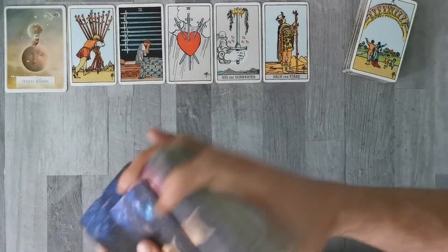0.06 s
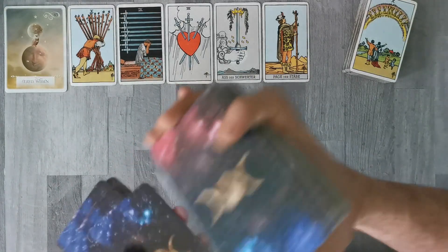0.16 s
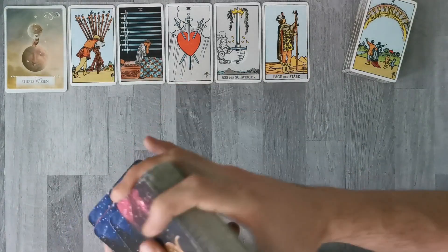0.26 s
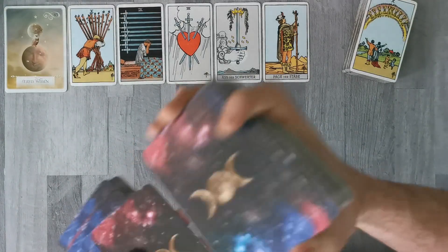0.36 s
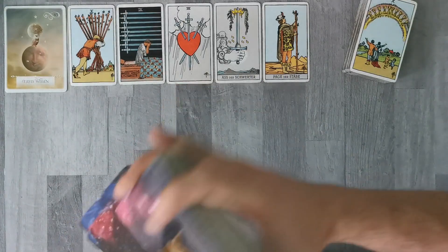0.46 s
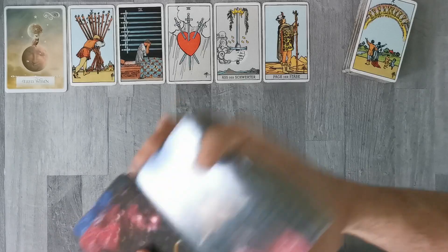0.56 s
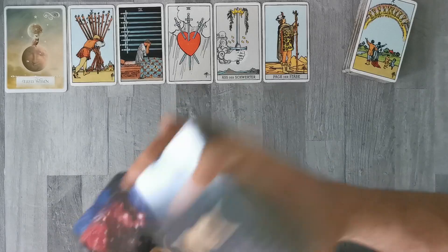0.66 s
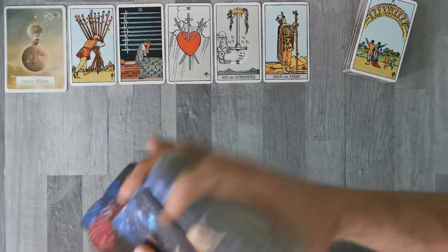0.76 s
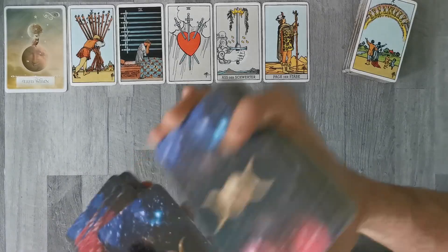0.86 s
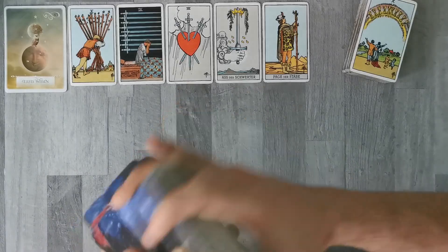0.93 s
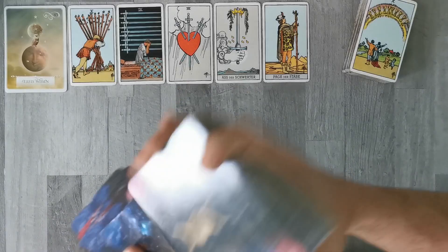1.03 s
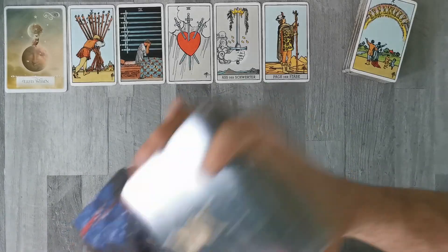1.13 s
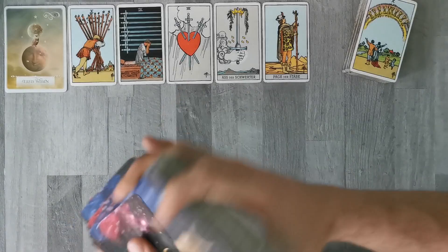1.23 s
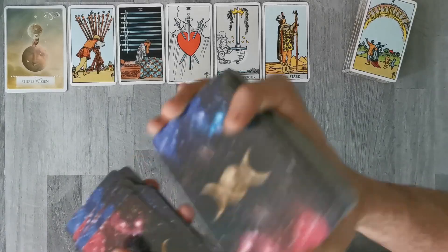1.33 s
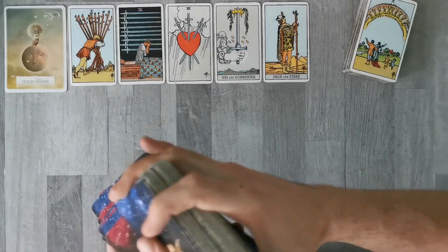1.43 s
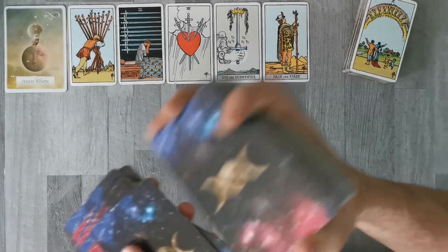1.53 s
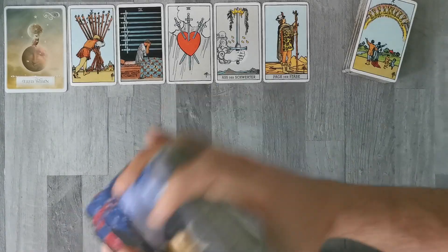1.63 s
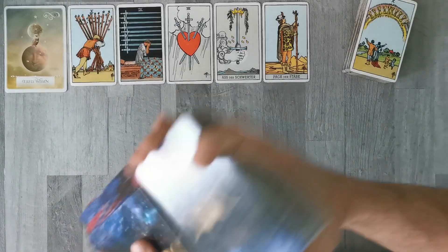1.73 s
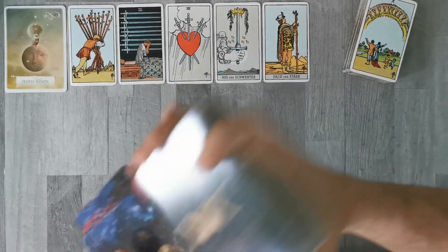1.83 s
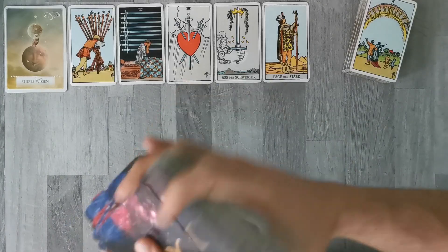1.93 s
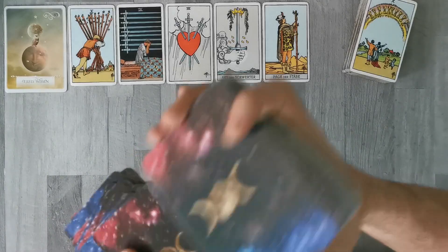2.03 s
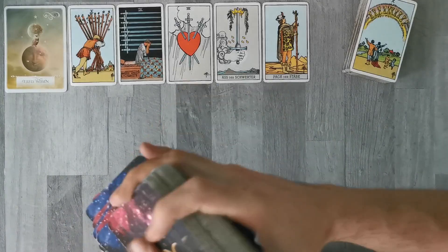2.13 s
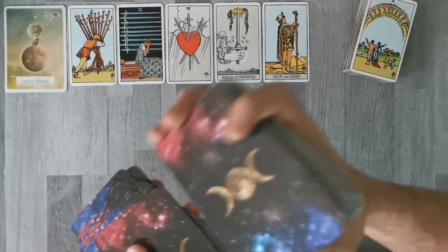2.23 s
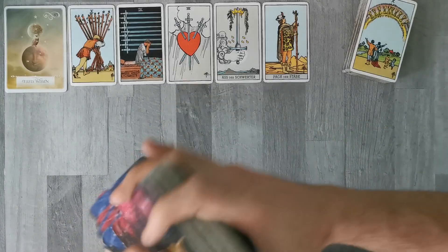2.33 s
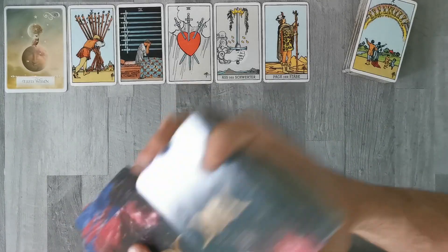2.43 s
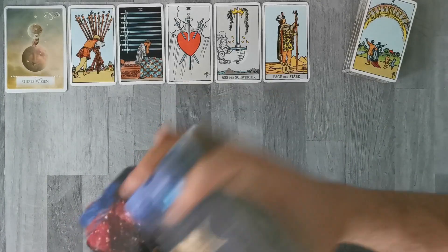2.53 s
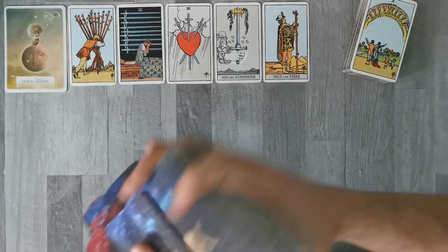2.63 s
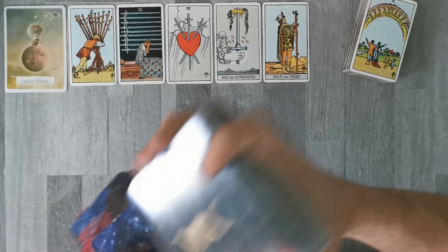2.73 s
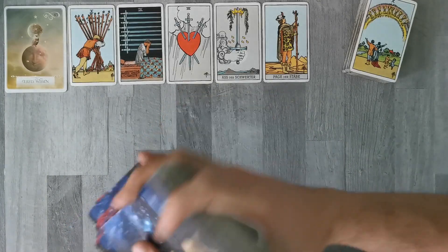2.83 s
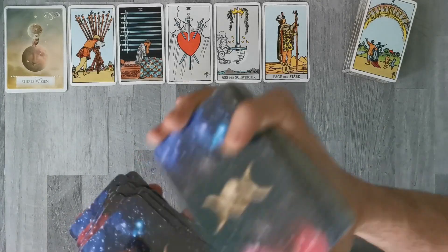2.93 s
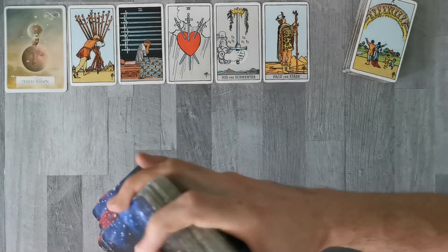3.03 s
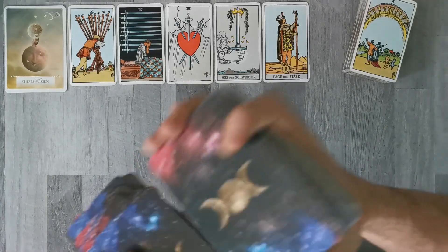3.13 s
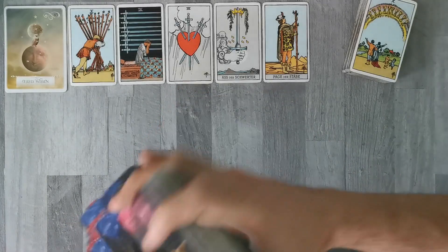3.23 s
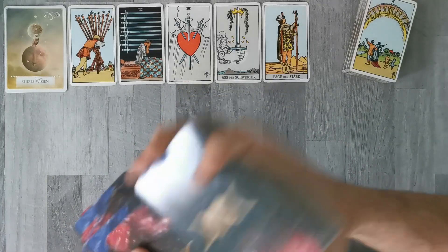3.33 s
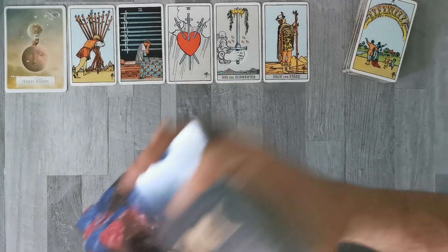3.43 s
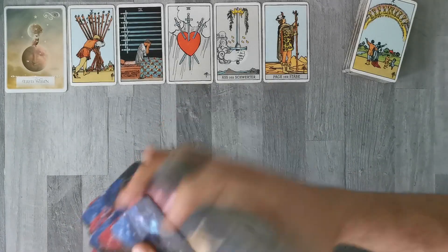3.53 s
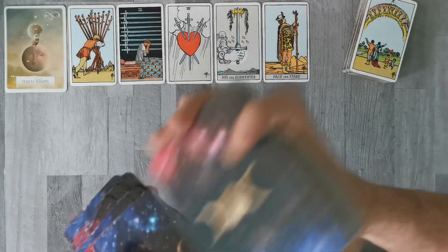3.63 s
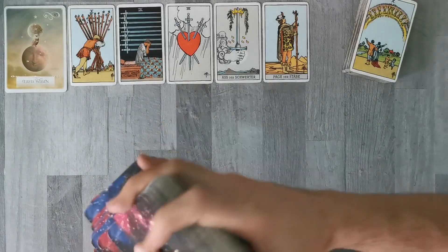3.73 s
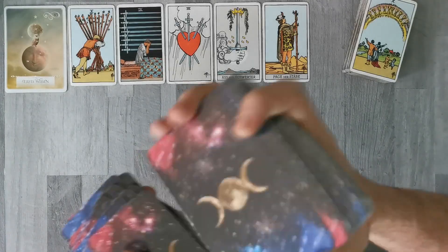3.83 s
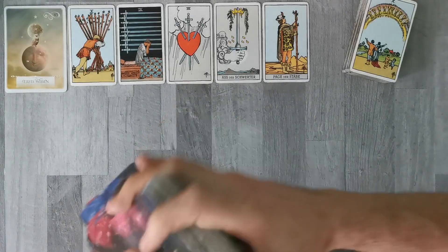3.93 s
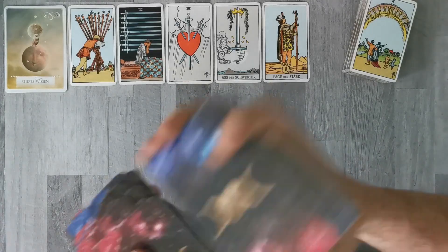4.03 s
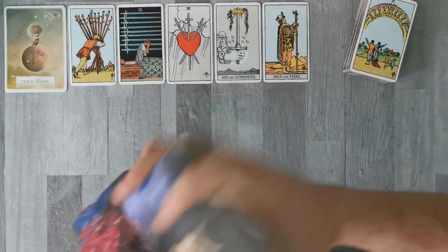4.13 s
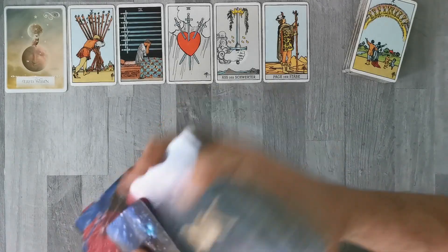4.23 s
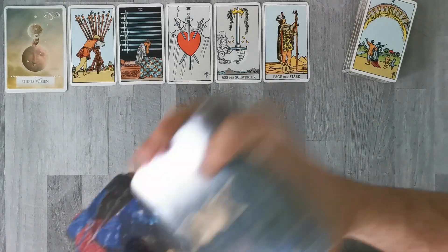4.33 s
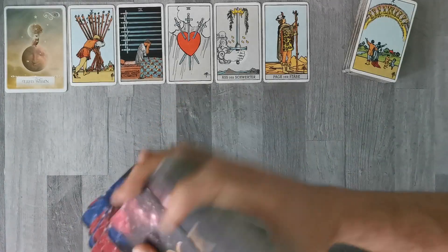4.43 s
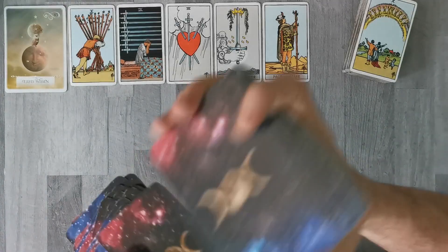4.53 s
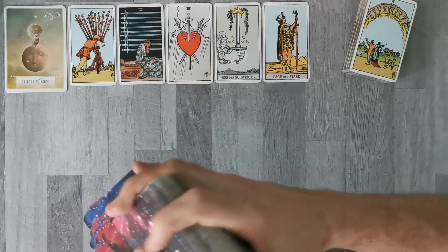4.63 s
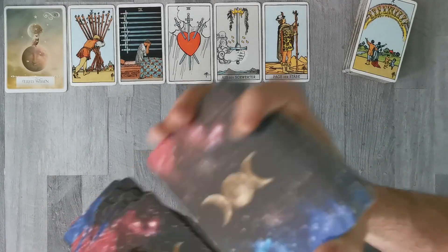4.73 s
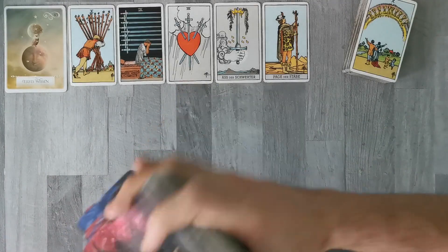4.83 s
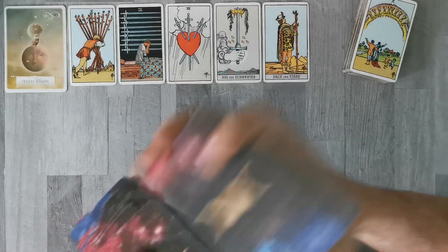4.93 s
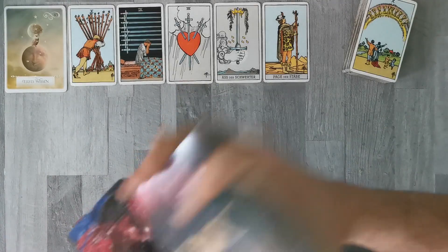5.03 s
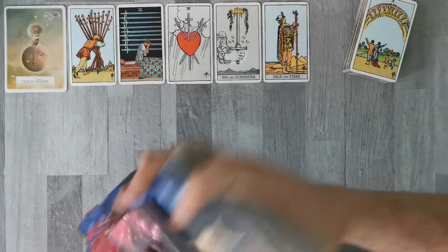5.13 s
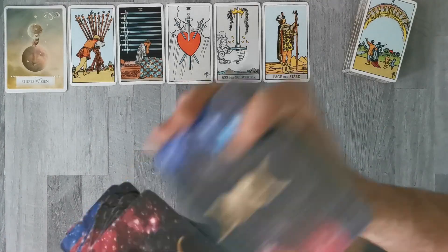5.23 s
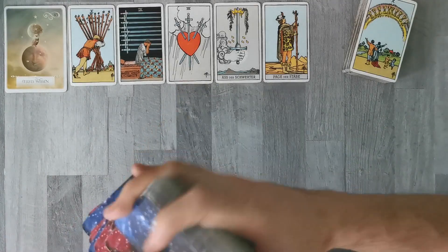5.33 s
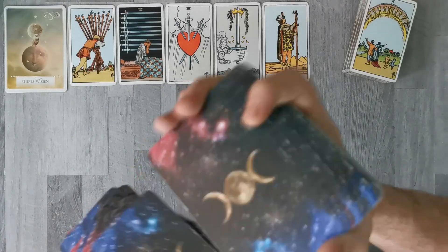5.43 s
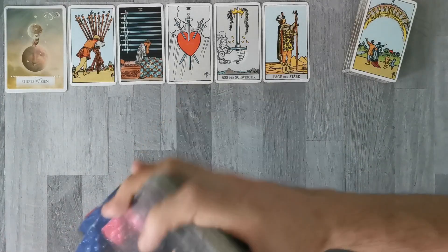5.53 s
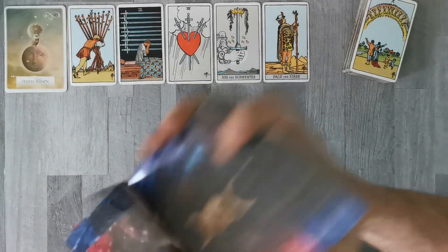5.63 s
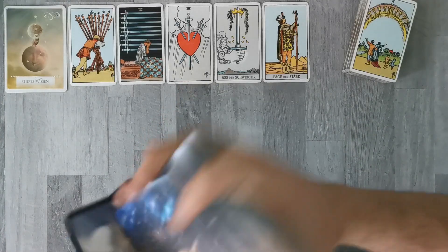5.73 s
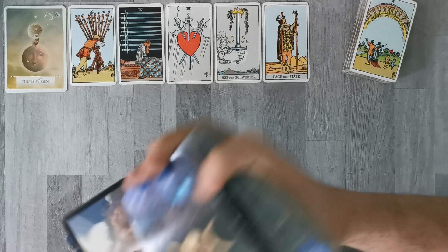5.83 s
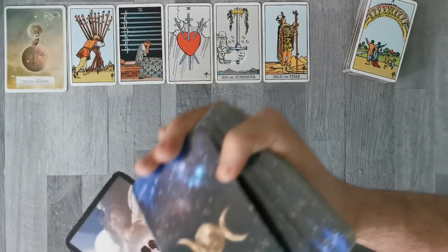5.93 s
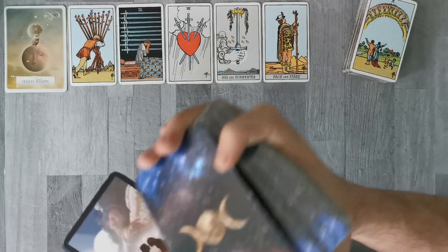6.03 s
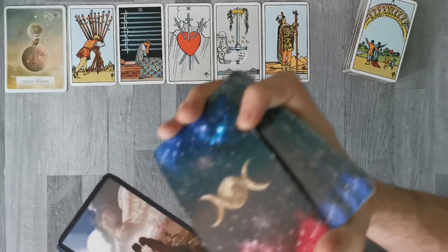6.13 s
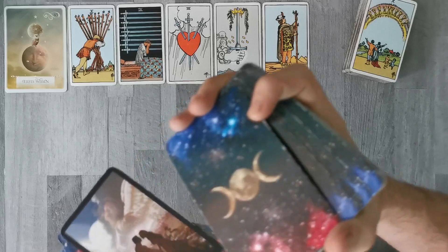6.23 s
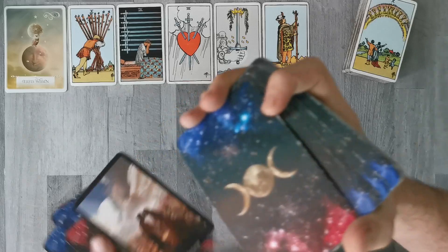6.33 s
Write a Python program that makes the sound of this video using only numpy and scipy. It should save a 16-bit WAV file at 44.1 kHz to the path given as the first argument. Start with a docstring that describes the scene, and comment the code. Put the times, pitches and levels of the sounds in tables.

```python
"""Bright swishes and hollow knocks, about four a second: a deck of large cards is shuffled overhand above
a table, close to a stereo microphone in a quiet, slightly live room. Each packet is gripped, slides along
the deck and drops into the cupped hand; card edges tick and the palm thuds. At the end a loose card flips
out with a few loud clacks. A low hum lies underneath."""
import sys
import numpy as np
from scipy import signal
from scipy.fft import rfft, irfft, next_fast_len
from scipy.io import wavfile
from scipy.ndimage import uniform_filter1d

SR = 44100
rng = np.random.default_rng(int(sys.argv[2]) if len(sys.argv) > 2 else 0)


def output_pcm(signal):
    """Save a mono or channel-first signal as 16-bit PCM at the path in sys.argv[1].

    Samples are clipped to [-1, 1] before scaling.
    """
    pcm = np.clip(np.atleast_2d(signal).T, -1, 1) * 32767
    wavfile.write(sys.argv[1], SR, np.round(pcm).astype(np.int16))


N = 280917

# packets dropping: (time [s], swell [s], edge hiss [dB], card flex [dB], knock [dB], hand hollow [Hz])
DROPS = [(0.009, .007, -26.5, -34, -30, 770), (0.236, 0.012, -22, -51, -28, 850),
         (0.480, 0.015, -23.5, -34.5, -43, 890), (0.699, 0.0093, -24, -30, -32.5, 800),
         (0.936, 0.024, -26, -30.5, -26.5, 994), (1.179, 0.0091, -18, -35.5, -47, 1030),
         (1.405, .013, -25.5, -28.5, -42.5, 780), (1.643, 0.0063, -20.5, -36, -31.5, 594),
         (1.875, 0.0067, -21.5, -35, -36.5, 580), (2.116, 0.013, -19.5, -31.5, -54.5, 810),
         (2.328, 0.0084, -19, -35, -35, 560), (2.569, .009, -22.5, -33, -45, 810),
         (2.802, 0.012, -22, -32.5, -50.5, 820), (3.01, 0.0096, -25, -30, -35, 600),
         (3.239, 0.0085, -19, -35.5, -31, 560), (3.466, .011, -25.5, -32.5, -24.5, 610),
         (3.699, 0.0066, -16, -32, -36.5, 603), (3.932, 0.0094, -20.5, -33, -41, 880),
         (4.148, 0.008, -21.5, -39.5, -28.5, 820), (4.383, 0.009, -20.5, -36, -31, 744),
         (4.608, 0.014, -24.5, -36.5, -39, 770), (4.836, 0.012, -22.5, -29, -43, 1020),
         (5.054, 0.0083, -23.5, -34, -34.5, 744), (5.289, 0.0082, -25.5, -38, -28.5, 1075),
         (5.527, .012, -22, -38, -27.5, 1018), (5.776, 0.02, -27, -29, -29.5, 730)]
# what card edge, flexing card, packet and palm each radiate: (frequency [Hz], level [dB])
EDGE_SPECTRUM = [(1500, -56), (3500, -10), (4500, -1), (5500, -1), (6200, -3), (7000, -0.5), (7700, -1.5),
                 (8800, 2.5), (9900, -2), (11000, 1.5), (13200, -4.5), (14000, -3), (16000, -2)]
FLEX_SPECTRUM = [(500, -40), (1000, -16.5), (1400, -1), (1800, 0.5), (2200, 5), (2650, 3.5), (3100, 1),
                 (3900, -3.5), (5000, -6.5), (9000, -51.5)]
PACKET_SPECTRUM = [(150, -21), (330, -4), (460, 3), (600, 8.5), (790, 7), (920, 3), (1080, 8.5), (1350, 3),
                   (2000, -13.5), (5000, -97.5)]
PALM_SPECTRUM = [(30, 5), (65, -20.5), (100, 7), (150, 3), (220, -8.5), (290, 1.5), (360, -2.5),
                 (480, -22.5), (1000, -45.5), (4000, -66)]
PARTS = (EDGE_SPECTRUM, FLEX_SPECTRUM, PACKET_SPECTRUM, PALM_SPECTRUM)
# balance of the room sound at the microphone: (frequency [Hz], left over right [dB])
ROOM_BALANCE = [(100, 11), (400, -6), (1000, -5), (2300, -5.5), (3800, 1), (5500, -6), (7000, -2.5),
                (8500, 1), (9700, -1), (10800, -11.5), (13000, -7), (16000, -14.5)]


def from_db(db):
    """Decibels to gain."""
    return 10 ** (np.asarray(db) / 20)


def unit_power(x):
    """Scale to a mean square of one."""
    return x / np.sqrt(np.mean(x ** 2) + 1e-20)


def at_hz(points, hz):
    """Read a table on a log-frequency axis."""
    points = np.array(points)
    return np.interp(np.log(np.maximum(hz, 1)), np.log(points[:, 0]), points[:, 1])


def fft_grid():
    """Padded transform length and its frequencies."""
    size = 2 * next_fast_len(N // 2 + SR // 2)
    return size, np.arange(size // 2 + 1) * SR / size


def colour(x, spectrum):
    """Minimum-phase filter with the given spectrum; white noise keeps its power."""
    size, hz = fft_grid()
    cepstrum = irfft(np.log(unit_power(from_db(at_hz(spectrum, hz)))))
    cepstrum[1:size // 2] *= 2
    cepstrum[size // 2 + 1:] = 0
    return irfft(rfft(x, size) * np.exp(rfft(cepstrum)))[..., :N]


def resonance(force, hz, width_hz):
    """One damped mode of hand, card or room; gain 1 at its peak."""
    r, w = np.exp(-np.pi * width_hz / SR), 2 * np.pi * hz / SR
    feed = (1 - r * r) / 2 * np.array([1, 0, -1])
    return signal.lfilter(feed, [1, -2 * r * np.cos(w), r * r], force + 1e-18)


def panned(balance, hz):
    """Left and right gains of constant total power."""
    gains = from_db(at_hz(balance, hz) * np.array([[.5], [-.5]]))
    return gains / np.sqrt(np.mean(gains ** 2, axis=0))


def swell(t, rise_s, fall_s, steepness=2):
    """A bell at half height at -rise_s and +fall_s; steeper flanks flatten its top."""
    return .5 ** (np.abs(t / np.where(t < 0, rise_s, fall_s)) ** steepness)


def landing(t, rise_s, decay_s):
    """A quick rise to t = 0, then an exponential decay."""
    return swell(np.minimum(t, 0), rise_s, rise_s) * np.exp(-np.maximum(t, 0) / decay_s)


def room_tone(air_db=-52.5, width=0.35):
    """The quiet room itself: a low rumble with a faint hum."""
    # steady air noise and the tones of the hum: (frequency [Hz], relative level [dB])
    air_spectrum = [(15, -24.5), (33, -1.5), (50, -1), (72, -12.5), (120, -13.5), (155, -17.5), (195, -11),
                    (240, -24), (330, -21.5), (500, -23), (1200, -33), (4000, -40), (15000, -47)]
    hum_tones = [(118.4, -61.5), (188.4, -62.5), (301.5, -73.5)]
    mid, side = colour(rng.standard_normal((2, N)), air_spectrum)
    t = np.arange(N) / SR
    hum = sum(from_db(db + 1) * np.sin(2 * np.pi * (hz * t + rng.random())) for hz, db in hum_tones)
    return from_db(air_db) * (mid + width * side * [[1], [-1]]) + np.sqrt(2) * hum


def standing_waves(cards):
    """The low resonances of the room ring on after each knock."""
    # room modes: (frequency [Hz], level against the direct sound [dB], width [Hz])
    modes = [(278, 2.5, 7.3), (312.4, -3, 7.6), (341, 2, 10.3), (613, 0, 11), (804, 4, 20),
             (1032, -7.5, 16)]
    return sum(from_db(db) * resonance(cards, hz, width) * panned(ROOM_BALANCE, hz)
               for hz, db, width in modes)


def reflections(size, hz, first_s=0.00046, build_s=0.001):
    """Stereo frequency response of the room: dense reflections that last longest in the midrange."""
    # colour of the room sound: (frequency [Hz], level [dB])
    room_spectrum = [(50, -34), (150, -13.5), (350, -2.5), (700, -3), (1200, -5.5), (2300, -1), (3600, -2),
                     (5000, -7), (7000, -1.5), (8500, -7), (11000, -2), (13000, -5), (16000, -10.5)]
    # reverberation: (frequency [Hz], time to fall by 60 dB [s])
    decay_times = [(100, 0.11), (500, 0.35), (2500, 0.28), (7000, 0.29), (11000, 0.24), (16000, 0.21)]
    # likeness of the room sound in both channels: (frequency [Hz], correlation [0-1])
    likeness = [(100, 0.6), (450, 0.92), (800, 0), (1200, 0.05), (5800, 0.27), (7000, 1), (9500, 0),
                (11000, 0.97), (16000, .72)]
    t = np.arange(SR * 2 // 3) / SR
    onset = np.clip((t - first_s) / build_s, 0, 1)
    white, bins = rfft(rng.standard_normal((2, len(t)))), np.fft.rfftfreq(len(t), 1 / SR)
    band_edges, tail = np.r_[0, np.geomspace(150, SR / 2, 18)], 0
    for low, high in zip(band_edges, band_edges[1:]):
        centre = (low + high) / 2
        mid, side = irfft(white * ((bins >= low) & (bins < high)), len(t))
        alike = at_hz(likeness, centre)
        stereo = np.sqrt(1 + alike) * mid + np.sqrt(1 - alike) * side * [[1], [-1]]
        decay = onset * from_db(-60 * t / at_hz(decay_times, centre))
        tail = tail + stereo * decay / np.linalg.norm(decay)
    return rfft(tail, size) * from_db(at_hz(room_spectrum, hz)) * panned(ROOM_BALANCE, hz)


def at_microphone(cards, wet_db, wander_hz, places, right_lag_s=0.00013, in_phase_hz=7200):
    """Direct sound, reflections and standing waves reach the two microphone ports."""
    # balance of the direct sound: (frequency [Hz], left over right [dB])
    direct_balance = [(100, 6.5), (350, 6), (700, -4), (1700, 1), (3000, 0.5), (6000, -2), (7000, 4),
                      (8300, 10.5), (9500, 11), (10800, -13), (13000, -4), (16000, -26.5)]
    size, hz = fft_grid()
    direct = panned(direct_balance, hz).astype(complex)
    # the left port is reached first; the top of the treble is nearly in phase in both
    direct[1] *= np.exp(-2j * np.pi * np.minimum(hz, in_phase_hz) * right_lag_s)
    # the point of contact darts over the cards, and each place has its own reflections
    rates = wander_hz * rng.uniform(.5, 2, (places, 1))
    nearness = np.cos(2 * np.pi * (rates * np.arange(N) / SR + rng.random((places, 1))))
    nearness /= np.linalg.norm(nearness, axis=0)
    reflected = sum(rfft(cards * share, size) * reflections(size, hz) for share in nearness)
    return irfft(rfft(cards, size) * direct + from_db(wet_db) * reflected)[:, :N] + standing_waves(cards)


def slips(per_s, spread_db, hiss):
    """Card on card: tiny slips of uneven size over a share of smooth hiss; unit power."""
    sizes = from_db(spread_db * np.minimum(rng.exponential(1, N), 3)) * rng.choice([-1, 1], N)
    impulses = unit_power(sizes * (rng.random(N) < per_s / SR))
    return unit_power(impulses + hiss * rng.standard_normal(N))


def flutter(rate_hz, depth_db):
    """Card after card slips past: a fast random gain of unit power."""
    knots = np.clip(rng.standard_normal(N // 20), -2, 2)
    wobble = np.interp(np.arange(N) * rate_hz / SR, np.arange(len(knots)), knots)
    return unit_power(from_db(depth_db * wobble))


def friction(fine, coarse, even_s=0.011):
    """Fine slips sound through the edge, coarse ones through flex, packet and palm; levels are evened."""
    parts = np.array([colour(x, part) for x, part in zip((fine, coarse, coarse, coarse), PARTS)])
    window = int(even_s * SR)
    power = uniform_filter1d(uniform_filter1d(parts ** 2, window), window)
    return parts / np.sqrt(np.abs(power) + 1e-3)


def contacts(hits, tone, chatter_s, chatter, trim_db, contact_s=0.002, heavy_share=0.43):
    """Each hit is a sharp contact and a brief card chatter, which the heavy packet and palm follow less."""
    force, t = np.zeros((4, N)), np.arange(SR // 100) / SR
    loose = chatter * np.array([[1], [1], [heavy_share], [heavy_share]])
    scale = np.sqrt(contact_s * SR / (1 + loose ** 2))
    for s, *levels in hits:
        rattle = rng.standard_normal(len(t)) * np.exp(-t / chatter_s)
        pulse = scale * ((t == 0) + loose * rattle / np.linalg.norm(rattle))
        start = round(s * SR)
        force[:, start:start + len(t)] += from_db(np.add(levels, trim_db))[:, None] * pulse
    return colour(sum(colour(x, part) for x, part in zip(force, PARTS)), tone)


def grips(light_db=-50, lead_s=.07):
    """One grip between drops, light or firm: (time [s], slide [dB], bump [dB], next drop [s])."""
    # firm grips, which bump the deck: (time [s], slide [dB], finger bump [dB])
    firm_grips = [(0.159, -39.5, -29), (0.386, -41.5, -24.5), (0.636, -40, -37), (0.864, -47, -27),
                  (1.087, -42.5, -22), (1.336, -33.5, -49), (1.563, -45, -43), (1.84, -37, -60),
                  (2.489, -46, -31), (2.721, -38.5, -54), (2.952, -35, -60), (3.396, -43.5, -32),
                  (3.63, -47, -30.5), (3.865, -39, -51), (4.099, -41, -44), (4.304, -49, -34),
                  (4.985, -46, -35), (5.673, -39.5, -50.5)]
    rows = []
    for (previous, *_), (drop, *_) in zip(DROPS, DROPS[1:]):
        firm = [grip for grip in firm_grips if previous < grip[0] < drop]
        grip = firm[0] if firm else (drop - lead_s, light_db, -np.inf)
        rows.append((*grip, drop))
    return rows


def packet_lifts(trim_db=(-7.5, -2, -8), bump_trim_db=-9.5, handling_db=-53, ease_s=.02):
    """Fingers grip the deck, then the faces of the cards rub until the next drop."""
    force = np.zeros((4, N))   # edge, flex, packet, palm
    for s, grip_db, bump_db, drop in grips():
        span = np.arange(int((s - .02) * SR), int((drop + .02) * SR))
        t = span / SR - s
        rubbing = swell(t - np.clip(t, 0, drop - s), rise_s=0.001, fall_s=0.023)   # held until the drop
        easing = from_db(-10.5 + 3 * np.exp(-np.maximum(t, 0) / ease_s))   # the moving packet loosens
        bending = from_db(0.151 * (grip_db + 50))   # a firmer grip flexes the cards more
        shapes = [rubbing, rubbing * easing * bending, rubbing * easing]
        force[:3, span] += from_db(np.add(trim_db, grip_db))[:, None] * shapes
        bump = from_db(bump_db + bump_trim_db) * landing(t - .005, rise_s=0.0018, decay_s=0.005)
        force[3, span] += bump + from_db(handling_db) * rubbing
    rub = slips(per_s=850, spread_db=2, hiss=0.84) * flutter(rate_hz=140, depth_db=5)
    return np.sum(force * friction(rub, rub), axis=0)


def light_ticks(catch_db=-47, settle_db=-37, settle_s=0.037, spread_db=3):
    """An edge catches at each grip, two cards settle after each drop: (time [s], level [dB], hardness)."""
    caught = [(s, catch_db) for s, *_ in grips()]
    settling = [(s + settle_s * rng.random(), settle_db) for s, *_ in DROPS for _ in range(2)]
    s, db = np.transpose(caught + settling)
    louder, harder = rng.standard_normal((len(s), 2)).T
    return np.column_stack([s, db + spread_db * louder, 0.61 + 0.15 * harder])


def deck_snaps():
    """Snaps and ticks in the hands: hard contacts ring the card edges, soft ones the packet and palm."""
    # clear snaps and taps: (time [s], level [dB], hardness [0 flat on the palm, 1 edge on edge])
    snaps = [(0.1691, -36.5, 0.67), (0.2272, -21.5, 0.44), (0.2655, -23.5, 0.8), (0.509, -28, 1),
             (0.6413, -31.5, 0.64), (0.7061, -29, 0.19), (0.724, -20, 0.86), (0.9335, -22, 0.82),
             (1.0935, -35, 0.025), (1.1348, -30.5, 0.71), (1.1918, -28, 0.69), (1.2126, -25, 0.58),
             (1.3407, -21.5, 0.72), (1.3485, -34.5, 0.48), (1.3565, -30, 0.67), (1.4105, -22.5, 0.83),
             (1.419, -23.5, 0), (1.7736, -24.5, 0), (1.7799, -27.5, 0.093), (1.7964, -31.5, 0.39),
             (1.8856, -34, 0.51), (1.906, -22.5, 0.87), (2.1488, -28, 0.47), (2.3391, -28, 0.51),
             (2.3599, -25, 0.1), (2.5973, -26.5, 0.39), (2.7251, -23.5, 0.64), (2.8134, -28.5, 0.42),
             (2.9512, -24.5, 0.56), (2.9567, -33, 0.31), (3.0045, -22.5, 0.59), (3.0151, -39, 0.75),
             (3.2747, -26.5, 0.74), (3.4655, -21.5, 0.91), (3.4749, -24, 0.67), (3.4987, -27.5, 0.29),
             (3.7342, -25.5, 0.2), (3.8672, -28.5, 0.4), (3.891, -28, 0.39), (3.934, -31, 0.61),
             (3.9566, -27.5, 0), (4.0999, -42, 0.51), (4.1615, -20, 0.46), (4.1784, -21, 0.65),
             (4.3832, -24.5, 0.88), (4.4215, -28.5, 0.95), (4.5985, -31.5, 1), (4.6077, -26, 0.59),
             (4.6465, -23, 0.99), (4.8477, -22, 0.83), (4.8669, -26.5, 0.52), (5.0077, -31.5, 0.38),
             (5.0644, -19.5, 0.58), (5.083, -23, 0.27), (5.2795, -26.5, 0.98), (5.2919, -21, .75),
             (5.3229, -19, 0.95), (5.5421, -29.5, 0.44), (5.672, -33.5, 0.51), (5.695, -28.5, 0.52)]
    # how edge, flex, packet and palm respond: (best hardness [0-1], level there [dB], loss one off [dB])
    response = [(0.99, 2.5, 42.5), (0.6, -2.5, 43), (0.22, -4, 21.5), (0.0076, -0.5, 18.5)]
    # colour of a small snap: (frequency [Hz], level [dB])
    tone = [(100, 3), (1300, 5), (2200, 4), (3500, 3.5), (4500, 10.5), (7000, 10.5), (8500, 6), (11000, 4),
            (16000, 4)]
    s, db, hardness = np.vstack([snaps, light_ticks()]).T
    best, best_db, loss_db = np.transpose(response)
    part_db = db[:, None] + best_db - loss_db * (hardness[:, None] - best) ** 2
    hits = np.column_stack([s, part_db])
    return contacts(hits, tone, chatter_s=0.0018, chatter=1.75, trim_db=(-0.6, 1.3, -0.22, 0.85))


def loose_card():
    """A stiff card flips out beside the deck, hits, rings briefly and settles."""
    # its hits: (time [s], edge hiss [dB], card flex [dB], knock [dB], palm thud [dB])
    hits = [(5.7922, -22, -28.5, -30, -31.5), (5.8088, -10, -27, -22, -20),
            (5.8762, -35.5, -26, -24, -41.5), (5.8845, -29, -15, -28, -18.5),
            (5.8868, -19, -11.5, -14.5, -19.5), (5.8994, -11.5, -18.5, -27, -28.5),
            (5.9075, -38.5, -31, -38.5, -46.5), (6.0105, -27, -27.5, -37.5, -57.5),
            (6.1092, -55, -44.5, -57, -44.5)]
    # their colour: (frequency [Hz], level [dB])
    tone = [(70, -6), (140, 0), (300, -2), (700, 1.5), (1000, 3.5), (1350, 0.5), (1750, 8), (2100, -0.5),
            (2500, 2), (3300, 2.5), (4500, 2.5), (5800, 0), (7000, 1), (8500, -5.5), (11000, -7.5),
            (16000, -12)]
    # modes of the card: (frequency [Hz], level [dB], width [Hz])
    modes = [(1340, -3.5, 90), (1714, 3, 130), (1960, -3.5, 130), (2450, -5.5, 120)]
    clacks = contacts(hits, tone, chatter_s=0.0017, chatter=4.7, trim_db=(1, -4, -2.5, 0))
    return clacks + sum(from_db(db) * resonance(clacks, hz, width) for hz, db, width in modes)


def packet_drops(approach_db=-18, usual_thud_db=-37.5, thud_follows=0.68, trim_db=(-.3, -1.8, -.5, 0)):
    """The packet scrapes faster and faster, then lands with a knock in the cupped palm."""
    # extra sizzle of the card edges at full speed: (frequency [Hz], level [dB])
    sizzle_spectrum = [(3000, -45), (6500, -21.5), (8500, -8), (10000, 0), (11200, -5.5), (13200, 10),
                       (15500, -6.5)]
    fine = slips(per_s=14000, spread_db=0.5, hiss=0.42) * flutter(rate_hz=350, depth_db=3.5)
    coarse = slips(per_s=600, spread_db=4.5, hiss=0.93) * flutter(rate_hz=110, depth_db=6)
    rub, out = friction(fine, coarse), np.zeros(N)
    rub[1] *= flutter(rate_hz=120, depth_db=3.5)   # single cards bend and flick free
    sizzle = from_db(-8.5) * colour(slips(per_s=22000, spread_db=0.5, hiss=0.55), sizzle_spectrum)
    usual_knock_db = np.mean(DROPS, axis=0)[4]
    for s, rise_s, edge_db, flex_db, knock_db, hollow_hz in DROPS:
        thud_db = usual_thud_db + thud_follows * (knock_db - usual_knock_db)
        gains = from_db(np.add([edge_db, flex_db, knock_db, thud_db], trim_db))
        span = np.arange(max(0, int((s - .1) * SR)), min(N, int((s + .2) * SR)))
        t = span / SR - s
        speed = swell(t, rise_s, fall_s=0.0067, steepness=np.where(t < 0, 3.1, 2.4))
        scrape = np.hypot(speed, from_db(approach_db) * swell(t, rise_s=0.029, fall_s=0.022))
        shapes = [scrape, landing(t, 0.01, 0.019), landing(t, 0.007, 0.013), landing(t, 0.0075, 0.027)]
        edge, flex, knock, thud = gains[:, None] * shapes * rub[:, span]
        bright = from_db(edge_db) * speed ** 2 * sizzle[span]   # a faster slide is a brighter one
        cupped = from_db(-5) * knock + from_db(2) * resonance(knock, hollow_hz, width_hz=130)
        out[span] += edge + bright + flex + cupped + thud
    return out


def scene():
    """The deck in the hands, its close snaps and the loose card, heard in the room over its hum."""
    snaps, clacks = deck_snaps(), loose_card()
    shuffle = at_microphone(packet_drops() + packet_lifts(), wet_db=0, wander_hz=40, places=6)
    snapping = at_microphone(snaps, wet_db=-1.5, wander_hz=39.83, places=3)
    flip = at_microphone(clacks, wet_db=-0.5, wander_hz=69.63, places=4)
    nudge_right = from_db([[-0.8], [0.8]])
    return room_tone() + snapping + flip * nudge_right + shuffle


def record(dry, cutoff_hz=16000):
    """The recorder clips at full scale and cuts the top of the treble."""
    low_pass = signal.ellip(12, .1, 90, cutoff_hz, fs=SR, output="sos")
    return signal.sosfilt(low_pass, np.clip(dry, -1, 1))


dry = scene()
out = record(dry)
output_pcm(out)
```